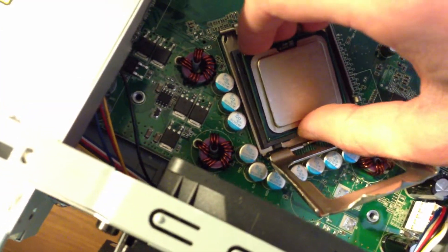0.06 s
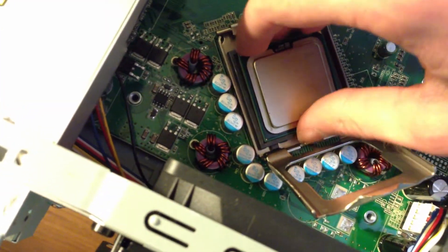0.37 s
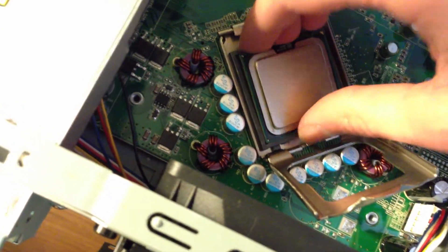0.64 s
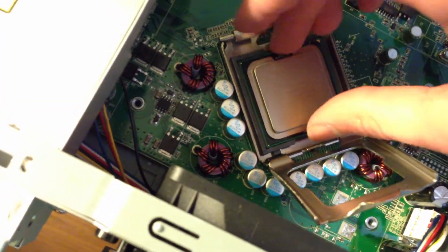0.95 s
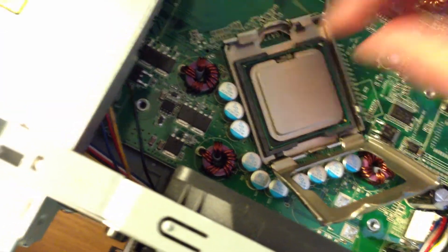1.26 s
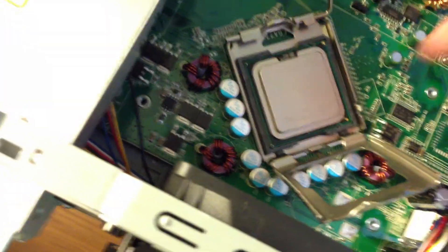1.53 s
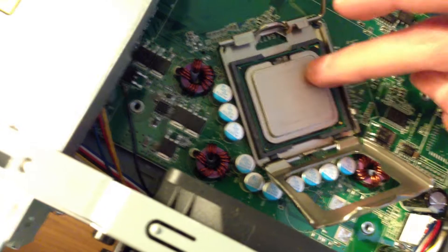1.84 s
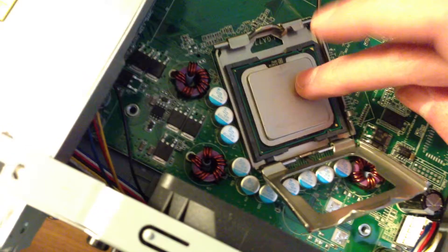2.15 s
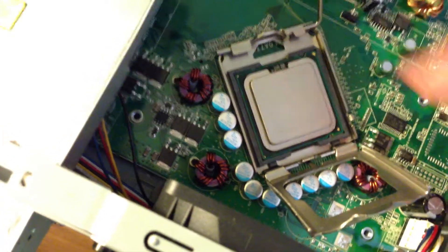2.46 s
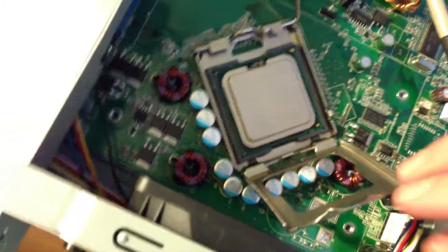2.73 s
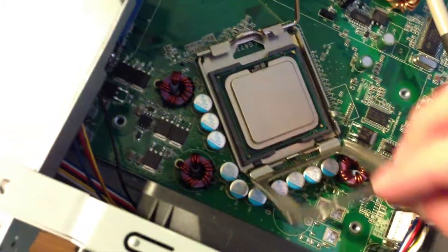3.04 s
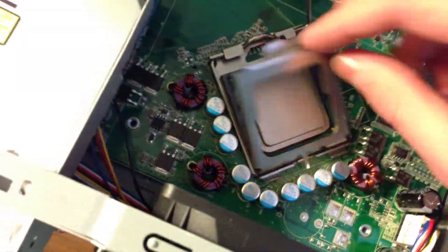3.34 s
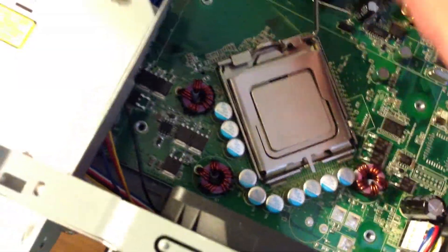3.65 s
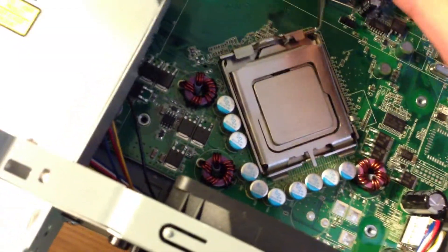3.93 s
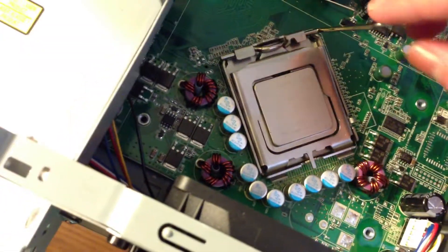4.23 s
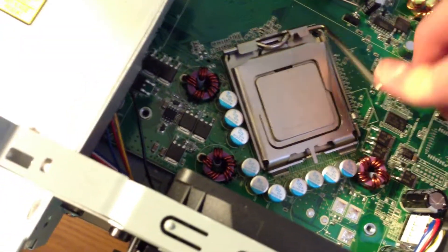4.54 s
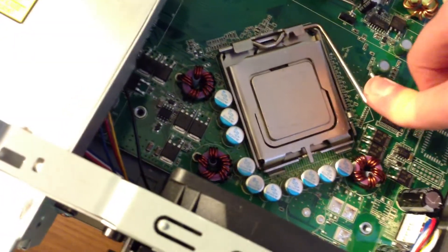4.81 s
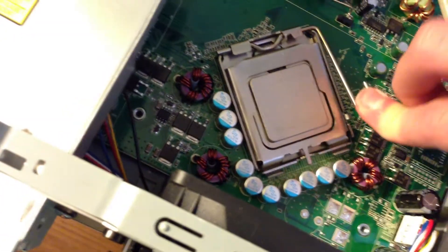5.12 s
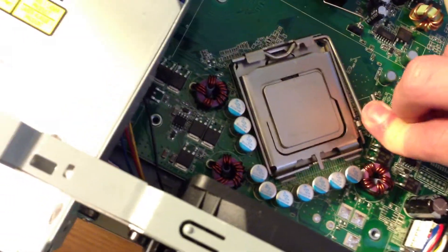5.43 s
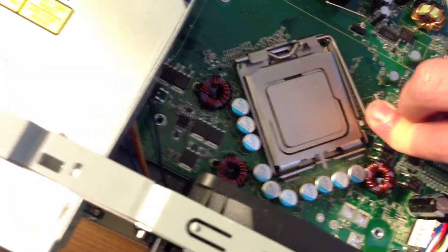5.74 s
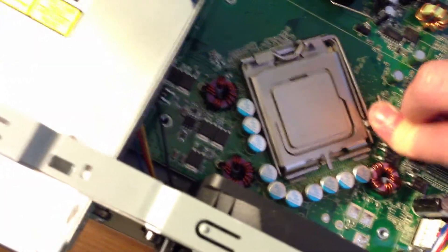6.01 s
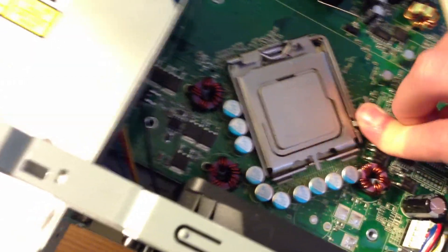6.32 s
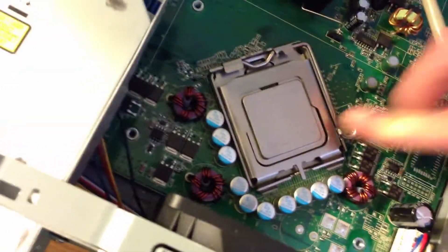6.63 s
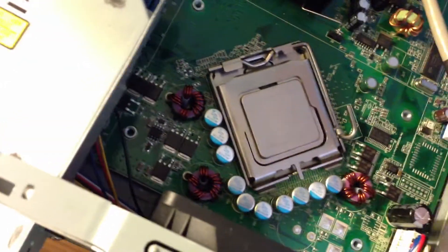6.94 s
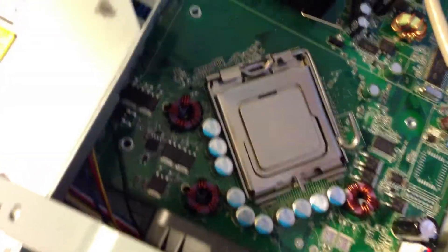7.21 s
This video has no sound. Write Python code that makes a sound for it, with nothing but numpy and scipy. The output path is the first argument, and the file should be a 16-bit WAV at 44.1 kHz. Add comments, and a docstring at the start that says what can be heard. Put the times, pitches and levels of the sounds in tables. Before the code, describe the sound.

A processor is seated on a circuit board, close to a small microphone in a quiet room with faint rumble and hiss. It begins with a light knock, then very faint ticks and rubs, and a tiny ringing tick at about 1.1 seconds as the chip drops in. From around 2.8 seconds a steel plate is lifted with small clicks, scraping and creaking on its dry hinge. At 3.5 seconds it falls shut with a bright, ringing snap and a quick chatter, by far the loudest sound. Between 3.9 and 4.2 seconds a wire lever gives a small ping and a cluster of sharp clicks, then creaks faintly as it is pressed down. It slips with a click at 5.5 seconds, rubs and creaks near 6.1 with a soft thud of the board, and snaps under its hook at about 6.6. One faint tick follows, then only room hiss.

```python
"""A processor is seated in its socket on a circuit board, close to a small microphone in a quiet room.
First the chip ticks and rubs into its seat, knocking the board. The steel load plate is lifted, scrapes
and creaks round its dry hinge, then drops shut with a loud, ringing snap and a quick chatter.
The wire lever pings as it is swung over and creaks as it is pressed down; it slips once and finally
clicks under its hook. Firm pushes flex the board; faint rumble and hiss lie under it all."""
import sys
import numpy as np
from scipy import signal
from scipy.fft import irfft
from scipy.io import wavfile

SR = 44100
rng = np.random.default_rng(int(sys.argv[2]) if len(sys.argv) > 2 else 0)


def dump_mix(stems):
    """Bounce the given channels to the path in sys.argv[1] as a 16-bit WAV at rate SR."""
    frames = np.atleast_2d(stems).T  # one column per channel
    limited = np.clip(frames, -1, 1)  # hard clip at full scale
    pcm = np.round(limited * 32767).astype(np.int16)
    wavfile.write(sys.argv[1], SR, pcm)


N = 329427
RING_TIME = np.arange(SR // 3) / SR  # time axis of one ring-out, in seconds

# the plate lands, then chatters on the frame: start_s, knock_db, clang_db
PLATE_LANDINGS = [(3.5185, -17, -14), (3.5222, -28, -22.5), (3.5265, -26.5, -24), (3.531, -33, -22),
                  (3.5364, -33.5, -26.5), (3.5387, -32, -26)]
# clack of the socket frame: frequency_hz, level_db
FRAME_SPECTRUM = [(1800, -32.5), (2450, -11.5), (2850, 5), (3400, -2.5), (3900, -4.5), (5300, -4.5),
                  (6700, -4), (8000, -22.5)]


def plate_slam(ring_db=-14.5):
    """The steel plate drops on the frame, rings, and chatters in a few uneven bounces."""
    # ring of the whole plate: pitch_hz, level_db, t60_s
    plate_modes = [(2120, -25, .28), (3165, -22, 0.2), (3338, -11, .1), (3989, -11, .08), (4270, -1, 0.075),
                   (5044, -5, .055), (5599, -3, .05), (5726, 2, .06), (6794, -5, .07), (7070, 0, 0.09),
                   (7133, -1, .08), (7176, 3, 0.09), (7912, 4, .07), (8116, 0, 0.07), (8229, 1, .07),
                   (9215, -1, 0.08), (9292, 0, .07), (9373, 0, .08), (9598, -6, 0.12), (9906, -1, 0.09),
                   (10012, -2, 0.11), (11197, 6, .08), (11600, -1, .05), (13366, -3, .15),
                   (13936, 6, 0.085), (14275, 3, .07)]
    # knock of the whole socket: frequency_hz, level_db
    knock_spectrum = [(150, -30), (530, -27), (650, -6), (900, -2), (1200, 0), (1400, -3), (1550, -0.5),
                      (2120, 0), (2300, -18), (3000, -35.5)]
    # clang of the plate struck flat: frequency_hz, level_db
    clang_spectrum = [(1800, -28.5), (2450, -16), (2850, 2.5), (3100, 1), (3500, -2.5), (4500, -7.5),
                      (5600, -1.5), (6250, -6.5), (6950, 0.5), (7900, 0.5), (8700, -4), (9800, 1.5),
                      (10800, -5.5), (11600, -1.5), (12300, -10.5), (13100, -10.5), (14300, -3),
                      (15400, -16.5)]
    out = np.zeros(N)
    add(out, PLATE_LANDINGS[0][0], undb(ring_db) * ring(plate_modes, scatter_db=1.5, rise=0.001))
    for start_s, knock_db, clang_db in PLATE_LANDINGS:
        add(out, start_s, undb(knock_db) * crack(knock_spectrum, t60=0.028, rise=0.0021))
        add(out, start_s, undb(clang_db) * crack(clang_spectrum, t60=0.029, rise=0.0005))
    return out


def lever_latch():
    """The tensed wire slips and snaps under its hook, striking the socket with a short metallic ring."""
    # slips and snaps: start_s, ring_db, tilt_db_per_octave, board_db, frame_db, steel_db
    snaps = [(5.5076, -42.5, 7.5, -51.5, -43.5, -47.5), (6.5308, -49.5, -9, -56, -58, -59),
             (6.566, -36.5, -0.5, -49, -41, -39.5)]
    # wire under tension: pitch_hz, level_db, t60_s
    tense_modes = [(2700, -3, .018), (2840, 0, .018), (3330, -2, .022), (3700, -6, .018), (4420, -3, .02),
                   (5230, -9, .022), (5500, 0, .018), (5810, -1, .018), (6700, 1, .016), (7175, -1, .018),
                   (7560, -1, .014), (7800, 1, .016), (9450, 4, .012), (11200, 2, .014), (14700, -4, .011)]
    out = np.zeros(N)
    for start_s, ring_db, tilt_db, *levels_db in snaps:
        wire = ring(tense_modes, scatter_db=1.5, rise=0.00016, tilt_db=tilt_db)
        add(out, start_s, level(wire, ring_db) + blow(levels_db))
    return out


def lever_ping():
    """The loose lever tips against its bearing: the wire pings and the frame clacks, the board is still."""
    # the lever tips over: start_s, ring_db, frame_db
    tips = [(4.1065, -43, -55)]
    # unloaded wire: pitch_hz, level_db, t60_s
    loose_modes = [(3490, -3, 0.019), (4830, -18, 0.019), (5220, -6.5, 0.021), (5720, -7, 0.023),
                   (7580, -10, 0.021), (9200, -10, 0.018), (9540, -3, 0.017), (10000, -7, 0.02),
                   (11640, -4, 0.025), (12990, -4, 0.038), (14400, -7, 0.026), (14750, -17, .02)]
    out = np.zeros(N)
    for start_s, ring_db, frame_db in tips:
        add(out, start_s, undb(ring_db) * ring(loose_modes, scatter_db=-3.5, rise=0.00021))
        add(out, start_s, undb(frame_db) * crack(FRAME_SPECTRUM, t60=0.03, rise=0.00016))
    return out


def handling(chip_drop_s=1.112, lid_db=-58):
    """Chip, plate and lever click and rub; blows and pushes flex the board; the chip's lid rings as it drops
    in."""
    # single contacts: start_s, strength_db, hardness (0-1), board_tilt_db_per_octave
    clicks = [(0.0701, -43.5, 0, -1), (0.155, -60.5, 0.57, 0), (0.585, -64.5, 0.08, 4),
              (1.1106, -57, 0.67, 3), (2.846, -59, 0.03, 0), (3.0125, -55.5, 0.05, -16),
              (3.11, -58.5, 0.04, -15), (3.131, -48, 0.13, 11), (3.135, -39.5, 0.2, -0.5),
              (3.2227, -55, 0.6, 0), (3.34, -50, .45, 10), (3.3565, -42.5, 0.22, 5.5),
              (3.4064, -45.5, 0.3, -6), (3.448, -50.5, 0.67, 8), (3.48, -46.5, 0.34, 2),
              (3.5827, -41, 0.64, -1.5), (3.927, -37.5, 0.25, 16), (3.9481, -47, 0.12, -15),
              (3.982, -52.5, .4, 0), (3.9874, -49.5, 0.69, 4), (4.0986, -59.5, 0.34, -7),
              (4.162, -38.5, 0.33, -4), (4.1708, -37.5, 0.62, 3), (4.181, -40.5, 0.44, 8),
              (4.1993, -55, 0.6, 6), (6.715, -55, 0.53, 11)]
    # sliding contacts: start_s, length_s, strength_db, hardness (0-1), board_tilt_db_per_octave
    rubs = [(0.39, 0.036, -66.5, 0.45, -14), (0.812, 0.026, -73.5, .35, -9),
            (1.017, 0.041, -71.5, 0.33, -8), (1.383, 0.089, -72, 0.47, -2),
            (1.907, 0.026, -74.5, 0.05, -22), (2.203, .02, -79, .1, -13), (2.824, 0.018, -65.5, 0.17, -13),
            (4.15, 0.028, -53.5, 0.06, -9), (4.413, 0.025, -67.5, 0.57, 8), (5.388, .06, -73, 0.5, 5),
            (5.959, 0.037, -64, 0.69, -7), (6.0865, 0.034, -54, 0.71, 2), (6.112, .025, -61.5, 0.23, -9),
            (6.536, 0.025, -54, 0.47, -23)]
    # the board flexes in its case under blows and pushes: start_s, boom_db, thud_db
    flexes = [(0.071, -67, -66), (0.161, -70, -77), (3.44, -72.5, -71.5), (3.52, -46.5, -52),
              (4.164, -68, -77), (5.508, -74, -76), (6.112, -66, -63), (6.534, -66, -63.5),
              (6.566, -67, -65.5), (6.716, -68.5, -79)]
    # lid of the chip: pitch_hz, level_db, t60_s
    lid_modes = [(2135, -7, .07), (2790, -5, .025), (3185, 0, 0.04), (3290, -1, .03), (3380, 0, .04),
                 (3940, -3, 0.03), (4700, -2, .025)]
    out = np.zeros(N)
    for start_s, strength_db, hardness, tilt_db in clicks:
        add(out, start_s, blow(contact_levels(strength_db, hardness), tilt_db))
    for start_s, length_s, strength_db, hardness, tilt_db in rubs:
        add(out, start_s, rub(length_s, contact_levels(strength_db, hardness), tilt_db))
    for start_s, boom_db, thud_db in flexes:
        add(out, start_s, board_flex(boom_db, thud_db))
    add(out, chip_drop_s, undb(lid_db) * ring(lid_modes, scatter_db=3, rise=0.0003))
    return out


def hinges():
    """The dry hinge scrapes until the plate lands; the pivots of plate and lever creak in short spells."""
    # hinge friction as the plate swings: time_s, gain_db
    friction = [(3.165, -70), (3.2, -70), (3.26, -64.5), (3.305, -73), (3.33, -66), (3.352, -65),
                (3.373, -58), (3.393, -53.5), (3.415, -55.5), (3.435, -59.5), (3.459, -64), (3.472, -57),
                (3.486, -58), (3.5, -59.5)]
    # creaks of the plate, then the lever: start_s, length_s, level_db, pitch_hz
    creaks = [(3.251, .01, -59, 1610), (3.275, 0.013, -70, 1590), (3.307, .008, -70, 1590),
              (3.3216, .008, -56, 1530), (3.34, .008, -56, 1563), (3.363, .008, -53, 1600),
              (3.377, .02, -49, 1596), (4.407, 0.024, -72.5, 1780), (4.494, 0.019, -78, 1670),
              (4.598, .03, -78, 1704), (6.089, .024, -61, 1650)]
    out = np.zeros(N)
    times, friction_db = np.transpose(friction)
    swing_s = PLATE_LANDINGS[0][0] - times[0]
    scrape = rub(swing_s, contact_levels(0, hardness=0.24), tilt_db=-3, slip_hz=1810, scatter_db=2.0)
    scrape_time = times[0] + np.arange(len(scrape)) / SR
    add(out, times[0], scrape * undb(np.interp(scrape_time, times, friction_db)))
    for start_s, length_s, level_db, pitch_hz in creaks:
        add(out, start_s, creak(length_s, level_db, pitch_hz))
    return out


def creak(length_s, level_db, pitch_hz, slip_hz=400, jitter=0.23):
    """Nearly even slips pump the narrow resonances of a dry pivot."""
    # dry steel pivot: pitch_ratio, level_db, t60_s
    pivot_modes = [(.965, -2, .04), (1, 0, .04), (1.045, -5, .035), (1.97, -22, .03)]
    size = int(length_s * SR)
    count = int(length_s * slip_hz) + 1
    place = np.clip((np.arange(count) + 0.5 + jitter * rng.standard_normal(count)) / count, 0, 1)
    slips = np.zeros(size + 1)
    slips[(place * size).astype(int)] = np.sqrt(np.sin(np.pi * place))
    modes = [(ratio * pitch_hz, db, t60) for ratio, db, t60 in pivot_modes]
    pivot = ring(modes, scatter_db=0.5, rise=0.001)
    return level(signal.fftconvolve(slips, pivot), level_db, length_s)


def blow(levels_db, tilt_db=0):
    """One contact sounds board, frame and steel, each at its own level."""
    return sum(level(part, db) for part, db in zip(socket(tilt_db), levels_db))


def rub(length_s, levels_db, tilt_db=0, slip_hz=1100, scatter_db=3):
    """Stick-slip: uneven little slips swell and fade, each one ringing the socket."""
    size = int(length_s * SR)
    count = int(length_s * slip_hz) + 2
    place, force = rng.random((count, 2)).T
    swell = np.sqrt(np.sin(np.pi * place))
    slips = np.zeros(size + 1)
    slips[(place * size).astype(int)] = swell * undb(2 * scatter_db * force)
    return sum(level(signal.fftconvolve(slips, part), db, length_s)
               for part, db in zip(socket(tilt_db), levels_db))


def contact_levels(strength_db, hardness):
    """Levels of board, frame and steel: a harder contact moves the sound from the board into the metal."""
    # a cushioned contact, hardness 0: board_db, frame_db, steel_db
    soft_db = (1, -21, -40)
    # steel on steel, hardness 1: board_db, frame_db, steel_db
    hard_db = (-11, -1, 2.5)
    return strength_db + (1 - hardness) * np.array(soft_db) + hardness * np.array(hard_db)


def socket(tilt_db):
    """Three responses to a blow: the board's woody knock, the frame's clack, the steel edges' tick."""
    # ring of the circuit board: pitch_hz, level_db, t60_s
    board_modes = [(760, -12, 0.037), (918, 0, 0.047), (1010, -3.5, 0.033), (1170, -2, 0.077),
                   (1240, -2, .055), (1430, -5, .035), (1530, -0.5, 0.06), (1593, 2.5, 0.053),
                   (1640, -3, 0.065), (1710, -3, 0.034), (1770, -4.5, 0.03), (2095, -8.5, 0.04)]
    # knock of the circuit board: frequency_hz, level_db
    board_spectrum = [(200, -25), (520, -24), (700, -16), (900, -4), (1200, -0.5), (1370, -4.5),
                      (1600, -0.5), (2050, -3.5), (2350, -17.5), (3500, -34)]
    # tick of thin steel edges: frequency_hz, level_db
    steel_spectrum = [(5500, -27), (7200, 4.5), (8500, -3), (10000, -1.5), (11500, -2), (12500, -7.5),
                      (14300, -4), (15500, -15.5)]
    board = crack(board_spectrum, t60=0.025, rise=0.001)
    board += undb(0.5) * ring(board_modes, scatter_db=1.5, rise=0.001, tilt_db=tilt_db)
    frame = crack(FRAME_SPECTRUM, t60=0.018, rise=0.00045)
    steel = crack(steel_spectrum, t60=0.021, rise=0.00019)
    return board, frame, steel


def board_flex(boom_db, thud_db, span_s=0.025):
    """A blow or a firm push makes the board boom briefly and the case thud."""
    # board flexing in the case: pitch_hz, level_db, t60_s
    flex_modes = [(138, -1, 0.15), (165, -7, .11), (204, 1, 0.15), (231, 0, 0.11), (285, -11, .1),
                  (341, -7, 0.06), (410, -10, 0.069), (480, -8, 0.055)]
    # thud of the case: frequency_hz, level_db
    case_spectrum = [(70, -34), (120, -10.5), (200, -5), (300, -8), (440, -2), (530, -2), (660, 2),
                     (800, -2), (1200, -26), (2500, -50)]
    boom = ring(flex_modes, scatter_db=1.0, rise=0.0061)
    thud = crack(case_spectrum, t60=0.044, rise=0.0014)
    return level(boom, boom_db, span_s) + level(thud, thud_db, span_s)


def room(x, wet_db=-14, t60=0.17):
    """Diffuse reflections from the open case, the bench and a small furnished room."""
    # tone of the tail: frequency_hz, level_db
    tail_spectrum = [(100, 9.5), (700, 1.5), (1500, -2.5), (4000, -2), (9000, -5.0), (15000, -4.5)]
    tail = noise(tail_spectrum, len(RING_TIME)) * fade(t60, rise=0.0012)
    tail /= np.sqrt(np.sum(tail ** 2))
    return undb(wet_db) * signal.fftconvolve(x, tail)[:N]


def room_tone(level_db=-67):
    """Steady room rumble and microphone hiss."""
    # rumble and hiss: frequency_hz, level_db
    floor_spectrum = [(18, -57), (30, -24.5), (69, -23), (140, -3), (207, -0.5), (358, -3), (490, -5.5),
                      (559, -6), (604, -7), (942, -11.5), (1160, -14), (3760, -8.5), (7040, -10.5),
                      (13900, -12), (15400, -13)]
    return undb(level_db) * noise(floor_spectrum, N)


def ring(modes, scatter_db, rise, tilt_db=0):
    """Decaying modes, tilted per octave; strengths and phases vary at random, as with where a blow lands."""
    chance = rng.standard_normal((len(modes), 2))
    out = np.zeros(len(RING_TIME))
    for (hz, db, t60), (spread, phase) in zip(modes, chance):
        gain = undb(db + tilt_db * np.log2(hz) + scatter_db * spread)
        out += gain * fade(t60, rise) * np.sin(2 * np.pi * (hz * RING_TIME + phase))
    return level(out, 0)


def crack(spectrum, t60, rise):
    """A noise burst standing for a dense crowd of quickly damped modes."""
    return level(noise(spectrum, len(RING_TIME)) * fade(t60, rise), 0)


def noise(spectrum, size):
    """Noise of rms 1, shaped by (frequency_hz, level_db) points."""
    hz, db = np.transpose(spectrum)
    bins = np.maximum(np.fft.rfftfreq(size, 1 / SR), 1)
    gain = undb(np.interp(np.log(bins), np.log(hz), db))
    x = irfft(gain * np.exp(2j * np.pi * rng.random(len(bins))), size)
    return x / x.std()


def fade(t60, rise):
    """Envelope with an attack of about rise seconds and a 60 dB decay in t60 seconds."""
    return (1 - np.exp(-RING_TIME / rise)) * np.exp(-np.log(1000) * RING_TIME / t60)


def level(x, db, span_s=0.006):
    """Scale a sound so that its first span_s seconds have this rms level."""
    return x * undb(db) / np.sqrt(np.mean(x[:int(span_s * SR)] ** 2))


def undb(db):
    """Decibels to gain."""
    return 10 ** (np.asarray(db) / 20)


def add(track, start_s, x):
    """Mix a sound into the track at start_s."""
    start = int(start_s * SR)
    track[start:start + len(x)] += x[:N - start]


def scene():
    """All contacts with their reflections, over the room tone, in mono."""
    contacts = handling() + hinges() + plate_slam() + lever_ping()
    snaps = lever_latch()
    reflections = room(contacts + undb(-3) * snaps)  # the latch sits a little drier
    return (contacts + snaps + reflections + room_tone())[None]


def gain_control(x, threshold_db=-25, slope=0.13, release_db_per_s=7):
    """A loud peak turns the gain down at once; it creeps back over seconds as the held peak decays."""
    over_db = np.maximum(20 * np.log10(np.abs(x) + 1e-9) - threshold_db, 0)
    released_db = release_db_per_s * np.arange(N) / SR
    held_db = np.maximum.accumulate(over_db + released_db, axis=-1) - released_db
    return x * undb(-slope * held_db)


def record(dry):
    """The small microphone loses the deep bass; the recorder rides its gain and cuts the top."""
    low_cut_hz, high_cut_hz = 94.7, 15450
    high_pass = signal.butter(3, low_cut_hz, "highpass", fs=SR, output="sos")
    low_pass = signal.ellip(10, 0.1, 80, high_cut_hz, fs=SR, output="sos")
    thin = signal.sosfilt(high_pass, dry)
    return signal.sosfilt(low_pass, gain_control(thin))


dry = scene()
out = record(dry)
dump_mix(out)
```